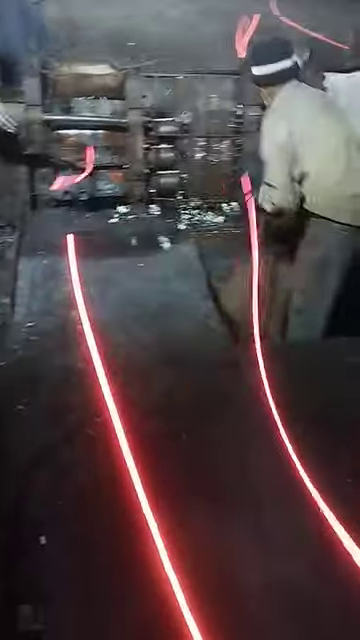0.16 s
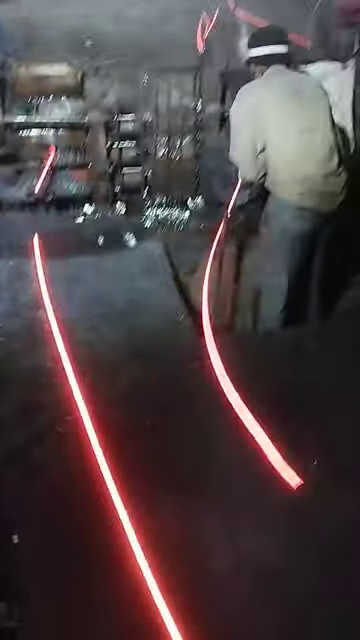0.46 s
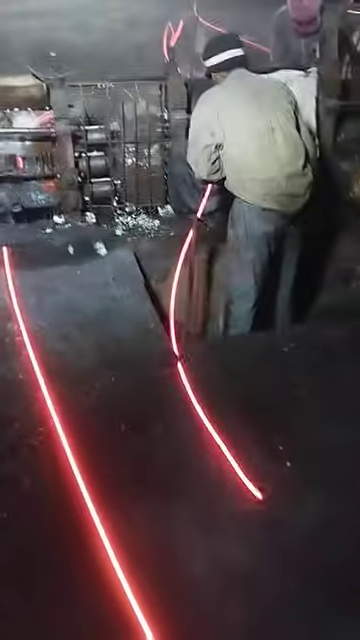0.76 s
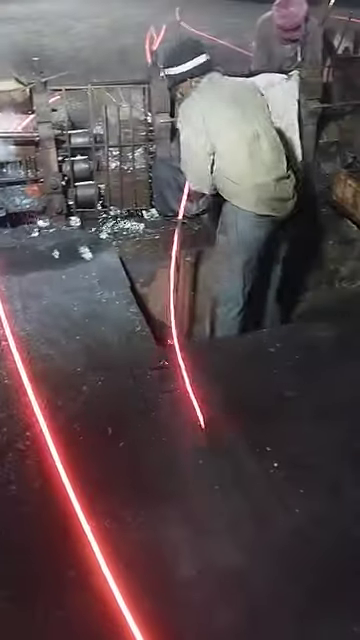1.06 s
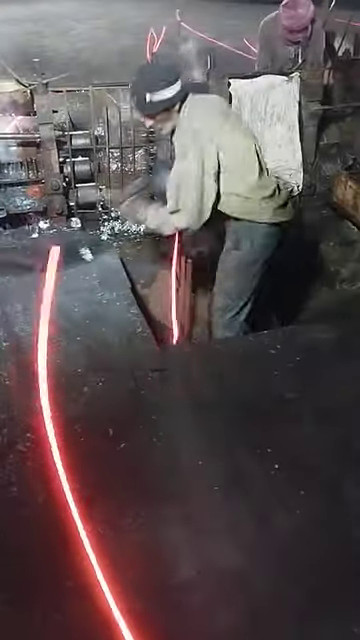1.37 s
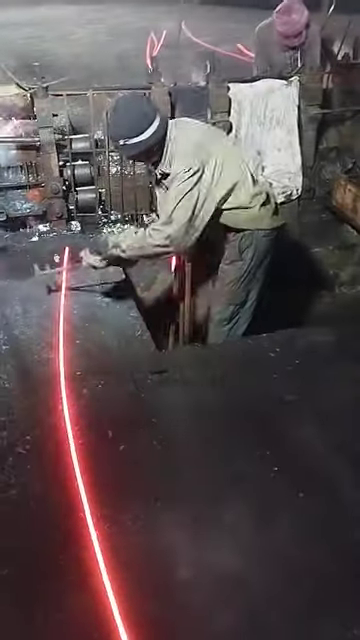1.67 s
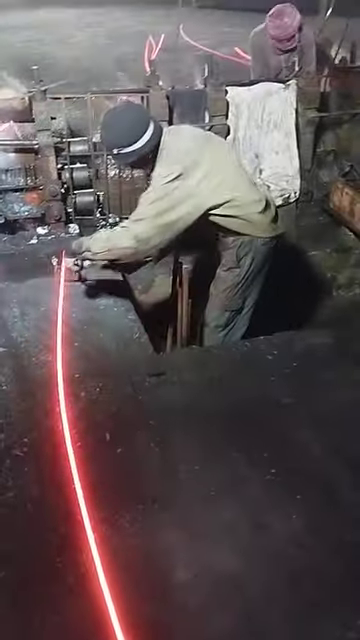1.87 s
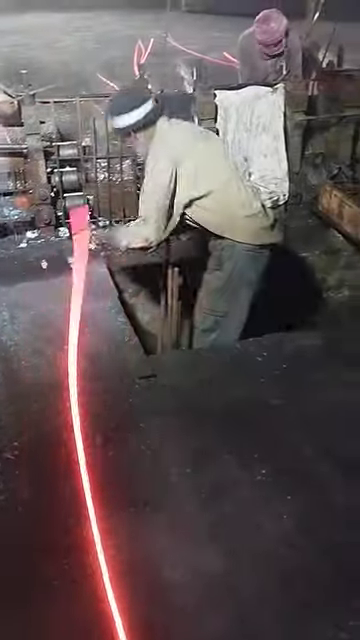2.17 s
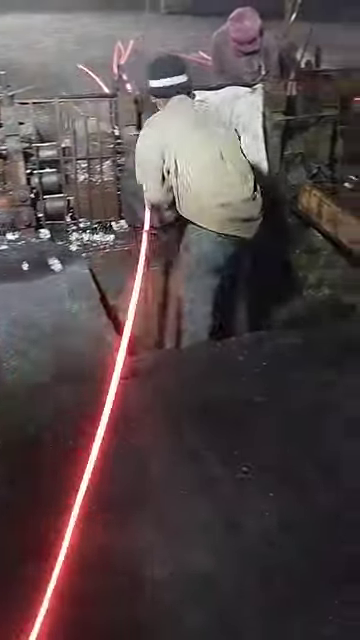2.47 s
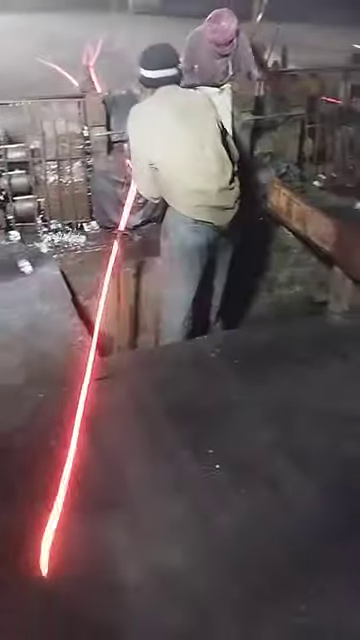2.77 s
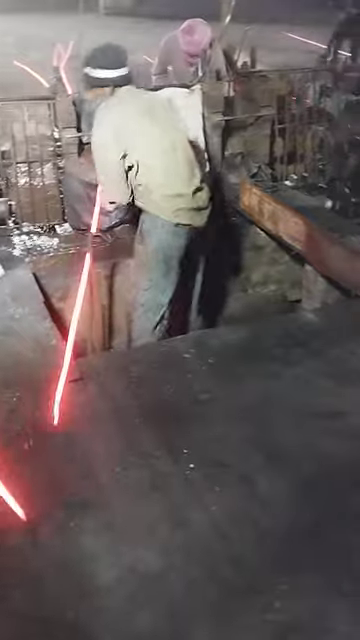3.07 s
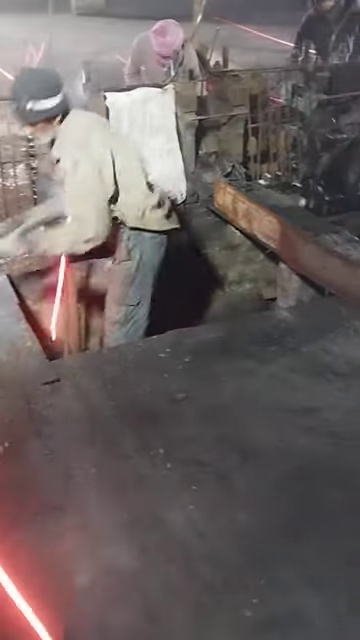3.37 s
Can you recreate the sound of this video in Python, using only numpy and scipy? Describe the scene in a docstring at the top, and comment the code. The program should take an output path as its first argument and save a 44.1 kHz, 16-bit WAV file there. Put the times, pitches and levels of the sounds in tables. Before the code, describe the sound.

A steel rolling mill drones on one low, unevenly throbbing tone over rumble and roar; rolls scrape several times a second, rods clatter in guides and couplings knock dully, in a large reverberant hall, in stereo.

```python
"""The stands of a steel rolling mill drone and rumble in a large hall: one low tone of uneven level over noise.
Shaft and gears hum as sines, slightly wavering. Couplings knock and steel parts rattle as noise and rings.
The rolls scrape and crackle about six times a second, and noise near one pitch makes brief squeals.
The rod slaps and clatters in the guides; tongs clank once, and faint thin high rings come mostly on the left."""
import sys
import numpy as np
from scipy import signal
from scipy.fft import rfft, irfft
from scipy.io import wavfile
from scipy.ndimage import uniform_filter1d, minimum_filter1d

SR = 44100
rng = np.random.default_rng(int(sys.argv[2]) if len(sys.argv) > 2 else 0)


def output_pcm(signal):
    """Save a mono or channel-first signal as 16-bit PCM at the path in sys.argv[1].

    Samples are clipped to [-1, 1] before scaling.
    """
    pcm = np.clip(np.atleast_2d(signal).T, -1, 1) * 32767
    wavfile.write(sys.argv[1], SR, np.round(pcm).astype(np.int16))


N = 155232

# spectrum of roar and rattle: (frequency [Hz], relative level [dB])
ROAR_SPECTRUM = [(100, -17.5), (350, -1), (480, 0.5), (570, -5.5), (820, -4.5), (1000, -10.5), (1300, -9),
                 (1700, -16), (2500, -19), (2900, -22.5), (5000, -23), (6800, -33), (8100, -47.5),
                 (9700, -43), (11200, -52), (13500, -38), (16000, -38.5)]
# spectrum of roll scrape and slap crack: (frequency [Hz], relative level [dB])
SCRAPE_SPECTRUM = [(300, -25), (1100, -15), (1800, 0), (2500, -3), (3100, -1.5), (4100, -1.5), (5200, -3),
                   (5800, -5), (6800, -5.5), (8100, -23.5), (9700, -21.5), (11200, -31.5), (13500, -17),
                   (16000, -24)]
# spectrum of guide clatter and slap body: (frequency [Hz], relative level [dB])
CLATTER_SPECTRUM = [(300, -27), (550, 4), (820, 6.5), (1000, -5), (1250, 1), (1700, -11.5), (2400, -6.5),
                    (3000, -23.5), (7000, -46.5)]
SURGE_FROM_HZ = 215  # rumble and hum tones above this follow the surge


def amp(db):
    """Decibels to gain."""
    return 10 ** (np.asarray(db) / 20)


def evened(x):
    """Scales to rms 1."""
    return x / np.sqrt(np.mean(x ** 2) + 1e-20)


def clock():
    """Time of each sample [s], and frequency of each bin [Hz]."""
    return np.arange(N) / SR, np.fft.rfftfreq(N, 1 / SR)


def read(points):
    """A table over frequency, read at each bin on a log axis."""
    f, value = np.transpose(points)
    return np.interp(np.log(clock()[1] + 1), np.log(f + 1), value)


def noise():
    """Unrelated white noise at each microphone."""
    return rng.standard_normal((2, N))


def coloured(x, gain):
    """Filters by a gain per bin; rms 1."""
    return evened(irfft(rfft(x) * gain, N))


def peak(hz, width_hz):
    """Response of one resonance, width at -3 dB; squaring it narrows the band."""
    return 1 / (1 + 2j * (clock()[1] - hz) / width_hz)


def drift(rate_hz):
    """Random drift of rms 1, mostly slower than rate_hz."""
    f = clock()[1]
    return coloured(rng.standard_normal(N), (f > 0) / (1 + (f / rate_hz) ** 4))


def dying(start_s, t60_s):
    """Sudden start, exponential decay by 60 dB in t60_s."""
    age = clock()[0] - start_s
    return (age >= 0) * np.exp(-np.log(1000) * np.maximum(age, 0) / t60_s)


def smeared(events, rise_s, t60_s):
    """Level of a series of (time, dB) blows drawn out by the hall; their powers add."""
    t = clock()[0]
    power = 0
    for start_s, db in events:
        rise = np.clip((t - start_s) / rise_s, 0, 1)
        power = power + (amp(db) * rise * dying(start_s, t60_s)) ** 2
    return np.sqrt(power)


def hall(x):
    """Diffuse tail of the hall: convolution with decaying noise."""
    tail = noise() * dying(0, t60_s=0.7)
    return signal.fftconvolve(x, tail / np.linalg.norm(tail[0]), axes=1)[:, :N]


def surge():
    """Common gain of the upper rumble and the gear tones."""
    # (time [s], level [dB])
    surge_points = [(0, -2), (.06, -1.5), (.2, -0.5), (.3, -8), (.39, 0), (.47, -4), (.6, 0.5), (.72, 1.5),
                    (.87, -0.5), (1, -4), (1.12, -4.5), (1.232, -8.5), (1.341, 0), (1.45, 0.5), (1.681, -3),
                    (1.85, 1.5), (1.94, -3.5), (2.02, -8.5), (2.1, -.5), (2.22, 0.5), (2.26, 1),
                    (2.32, -1.5), (2.5, -1.5), (2.73, 2.5), (2.76, -4.5), (2.8, 1), (3.1, -1), (3.31, -0.5),
                    (3.365, -4), (3.41, 1), (3.52, -4)]
    return amp(np.interp(clock()[0], *np.transpose(surge_points)))


def motor():
    """Shaft and gear tones that waver slightly at random in pitch and level; the upper ones also surge."""
    # continuous tones: (mean frequency [Hz], rms level [dB], left-right balance [dB])
    hums = [(64.6, -28, 0.4), (97.14, -33.5, 0), (306.5, -20.5, -1), (613, -40.5, 9)]
    top_wander_hz, waver_db = 0.47, 1.2  # wander of the last tone; lower tones wander less
    out = np.zeros((2, N))
    for hz, db, pan_db in hums:
        wander_hz = top_wander_hz * np.sqrt(hz / hums[3][0])
        turns = np.cumsum(hz + wander_hz * drift(3.04)) / SR + rng.random()
        tone = np.sin(2 * np.pi * turns) * amp(waver_db * drift(4.0))
        if hz > SURGE_FROM_HZ:
            tone = tone * surge()
        out += amp([[db + pan_db / 2], [db - pan_db / 2]]) * evened(tone)
    return out


def rumble():
    """Low noise of the machinery; its upper part surges."""
    # (frequency [Hz], relative level [dB])
    rumble_spectrum = [(15, -31.5), (38, -18.5), (55, -16.5), (90, -8.5), (115, -12), (140, -1), (168, 0),
                       (202, 2), (224, -8), (245, -1.5), (320, -6), (350, -9), (450, -15), (600, -34),
                       (1200, -69)]
    whole = amp(-12.5) * coloured(noise(), amp(read(rumble_spectrum)))
    low = irfft(rfft(whole) / (1 + (clock()[1] / SURGE_FROM_HZ) ** 12), N)
    return low + (whole - low) * surge()


def roar():
    """Broad noise with a slow swell and a fast flutter."""
    level_db, swell_db, flutter_db = -25.5, 0.5, 1
    level = amp(level_db + swell_db * drift(1.4) + flutter_db * drift(28))
    return level * coloured(noise(), amp(read(ROAR_SPECTRUM)))


def rattle():
    """Many small blows at random times, each a short decaying burst of noise."""
    blows_per_s, level_db, spread_db = 100, -34, 3
    strength = amp(spread_db * np.minimum(rng.exponential(1, N), 2))
    blows = (rng.random(N) < blows_per_s / SR) * strength
    envelope = signal.fftconvolve(blows, dying(0, t60_s=0.034))[:N]
    bursts = coloured(noise() * envelope, amp(read(ROAR_SPECTRUM)))
    return amp(level_db) * evened(bursts + 0.11 * hall(bursts))


def loose_parts(count=30):
    """Small steel parts, each ringing briefly at its own pitch when shaken."""
    lowest_hz, highest_hz, level_db, t60_s, blows_per_s = 594, 2822, -37, 0.14, 260
    t, out = clock()[0][:SR // 2], np.zeros((2, N))
    for hz in np.geomspace(lowest_hz, highest_hz, count) * rng.uniform(0.94, 1.04, count):
        tone = np.sin(2 * np.pi * (hz * t + rng.random((2, 1))))
        ring = tone * np.exp(-np.log(1000) * t / t60_s) / hz ** 0.64
        blows = (rng.random(N) < blows_per_s / count / SR) * rng.uniform(0.17, 1, N)
        out += signal.oaconvolve(blows[None], ring, axes=1)[:, :N]
    return amp(level_db) * evened(out + 0.5 * hall(out))


def clank_and_high_rings():
    """Tongs snap shut on the rod with one ringing clank; faint high rings are narrow decaying noise."""
    # clank: (frequency [Hz], relative level [dB])
    clank_spectrum = [(500, -16), (2000, -11), (2480, 3), (3000, 3.5), (5200, 1.5), (6800, -7), (8200, -22),
                      (10000, -23), (11500, -18.5), (14000, -16), (16000, -19.5)]
    # faint thin high rings: (time [s], level before panning [dB], frequency [Hz])
    high_rings = [(.209, -48, 13300), (.795, -51, 9780), (1.388, -55, 10800), (2.656, -44, 13300)]
    clank_s, hall_db = 2.03, -10
    clank = coloured(noise(), amp(read(clank_spectrum)))
    hits = amp(-29) * dying(clank_s, t60_s=0.16) * clank
    clank_ring = coloured(noise(), peak(2600, width_hz=300) ** 2)
    hits = hits + amp(-31) * dying(clank_s, t60_s=0.35) * clank_ring
    for start_s, db, hz in high_rings:
        high_ring = coloured(noise(), peak(hz, width_hz=250) ** 2)
        pan = amp([[-2], [-9]])  # louder on the left
        hits = hits + amp(db) * dying(start_s, t60_s=0.2) * high_ring * pan
    return hits + amp(hall_db) * hall(hits)


def guides():
    """Lumpy bursts of rod clatter: noise of quickly varying level under decaying envelopes."""
    # (time [s], level [dB])
    clatters = [(.19, -23.5), (.66, -26), (1.035, -24.5), (1.305, -22.5), (1.6, -25.5), (1.43, -27.5),
                (1.93, -23), (2.25, -24), (2.66, -25), (2.84, -25.5), (3.25, -22), (3.35, -25.5)]
    grain_db = 1
    clatter = coloured(noise() * amp(grain_db * drift(90)), amp(read(CLATTER_SPECTRUM)))
    return smeared(clatters, rise_s=0.016, t60_s=0.6) * clatter


def clacks():
    """The rod slaps the guides: a bright crack over the duller clatter of the guide, then the hall."""
    # (time [s], crack level [dB], body level [dB])
    slaps = [(0.337, -29, -38), (.385, -31.5, -28), (.544, -33.5, -32.5), (0.702, -34, -40.5),
             (.743, -32.5, -39), (1.035, -36.5, -23), (1.391, -39, -23), (1.871, -36, -30.5),
             (2.176, -40, -24.5), (2.272, -26, -32.5), (2.303, -31, -31), (3.149, -38, -18.5),
             (3.247, -33, -37), (3.442, -35, -46.5)]
    rise_s, t60_s, hall_db = 0.003, 0.11, -7
    crack_level = smeared([(s, db) for s, db, _ in slaps], rise_s, t60_s)
    body_level = smeared([(s, db) for s, _, db in slaps], rise_s, t60_s)
    crack = crack_level * coloured(noise(), amp(read(SCRAPE_SPECTRUM)))
    body = body_level * coloured(noise(), amp(read(CLATTER_SPECTRUM)))
    return crack + body + amp(hall_db) * hall(crack + body)


def couplings():
    """Dull knocks of the loose couplings: low noise with a soft start and a long decay."""
    # spectrum: (frequency [Hz], relative level [dB])
    knock_spectrum = [(100, -33), (210, -27), (260, 13.5), (330, -1), (420, -2), (600, -9), (850, -15.5),
                      (1400, -20.5), (2500, -32), (6000, -36.5), (9000, -55)]
    # (time [s], level [dB])
    knocks = [(.37, -10.5), (1.31, -14.5), (1.79, -14.5), (2.15, -13.5), (2.30, -17.5), (2.85, -18),
              (3.15, -13)]
    return smeared(knocks, rise_s=0.028, t60_s=0.87) * coloured(noise(), amp(read(knock_spectrum)))


def squeals():
    """The rod sticks and slips for a moment, giving a rough ring near one pitch."""
    # (peak time [s], level [dB], pitch [Hz], standard deviation of the Gaussian envelope [s])
    squeal_events = [(0.193, -39.5, 4200, 0.025), (0.743, -38.5, 4100, 0.03), (1.098, -30, 1160, 0.055),
                     (1.31, -37, 2670, 0.016), (2.354, -38, 2540, .04), (3.28, -36.5, 3970, 0.039),
                     (3.38, -34, 1760, 0.035)]
    width_share = 0.09  # of the pitch
    t, out = clock()[0], 0
    for peak_s, db, hz, length_s in squeal_events:
        envelope = np.exp(-0.5 * ((t - peak_s) / length_s) ** 2)
        out = out + amp(db) * envelope * coloured(noise(), peak(hz, width_share * hz) ** 2)
    return out


def crackle(count=22):
    """Scale cracks under the rolls: many tiny snaps, each ringing in its own band."""
    lowest_hz, highest_hz, width_share = 1500, 5500, 0.16
    snaps_per_s, t60_s, spread_db = 600, 0.04, 3
    decay = np.exp(-np.log(1000) / (t60_s * SR))  # per sample
    out = 0
    for hz in np.geomspace(lowest_hz, highest_hz, count):
        strength = amp(spread_db * np.minimum(rng.exponential(1, N), 2.5))
        snaps = (rng.random(N) < snaps_per_s / count / SR) * strength
        level = signal.lfilter([1], [1, -decay], snaps)
        out = out + rfft(noise() * level) * peak(hz, width_share * hz) ** 2
    return evened(irfft(out, N))


def rolls():
    """The rolls grind grit against the guides and set the steel ringing, now in one mode, now in another."""
    # scrapes of the turning rolls: (peak time [s], level [dB], fall to 1/e of the power [s])
    scrapes = [(0.123, -33, 0.027), (0.198, -37, 0.041), (0.344, -36, 0.04), (0.49, -33, 0.085),
               (0.708, -33, 0.053), (0.88, -35.5, 0.045), (1.08, -32, 0.054), (1.3, -33.5, 0.037),
               (1.45, -34.5, 0.05), (1.663, -37.5, 0.066), (1.874, -33.5, 0.052), (2.133, -40, 0.098),
               (2.286, -30.5, 0.068), (2.444, -34, 0.06), (2.667, -35, 0.11), (2.853, -32.5, 0.044),
               (3.046, -34.5, 0.048), (3.193, -34, 0.05), (3.26, -31, 0.055), (3.374, -37, 0.07),
               (3.468, -35, 0.05)]
    # modes of the rolls and guides: (frequency [Hz], gain at the peak [dB])
    steel_modes = [(791, 10.5), (845, 6), (920, 9), (1174, 6), (1227, 3), (1384, 5.5), (2371, -2),
                   (2482, -1.5), (2557, -2.5), (2660, -3), (2918, -3.5)]
    rise_share = 0.48  # rise time over fall time
    grit_db, crackle_db, flicker_db = 0.5, -4.5, 2.5
    idle_db, scrape_ring_db = -41.5, -1.5  # ring at all times; ring relative to the scrape
    width_at_1khz_hz = 10
    t = clock()[0]

    power = 0
    for peak_s, db, fall_s in scrapes:
        spread_s = fall_s * np.where(t < peak_s, rise_share, 1)
        power = power + amp(db) ** 2 * np.exp(-((t - peak_s) / spread_s) ** 2)
    rub = np.sqrt(power)

    grains = noise() * amp(grit_db * drift(120)) + amp(crackle_db) * crackle()
    grit = coloured(grains, amp(read(SCRAPE_SPECTRUM)))

    ring = 0
    for hz, db in steel_modes:
        response = amp(db) * peak(hz, width_at_1khz_hz * np.sqrt(hz / 1000)) ** 2
        flicker = amp(flicker_db * np.minimum(drift(12), 1))
        ring = ring + irfft(rfft(noise()) * response, N) * flicker
    return rub * grit + (amp(idle_db) + amp(scrape_ring_db) * rub) * evened(ring)


def drone():
    """The stands throb on one low tone whose pitch wavers a little."""
    # (time [s], rms level [dB])
    drone_level = [ (0, -9.5), (.09, -14), (.17, -11.5), (.23, -24), (.28, -7.5), (.31, -43), (.35, -32),
                   (.39, -17), (.5, -10.5), (.72, -15.5), (.79, -22), (.84, -11), (.935, -9), (.97, -40),
                   (1.04, -12.5), (1.2, -8.5), (1.245, -33), (1.29, -12), (1.38, -19.5), (1.495, -10),
                   (1.53, -30), (1.62, -9.5), (1.78, -18), (1.95, -15), (1.995, -6), (2.05, -28),
                   (2.12, -12.5), (2.24, -25), (2.32, -9.5), (2.36, -27), (2.45, -12.5), (2.58, -20.5),
                   (2.71, -14), (2.76, -37), (2.81, -13), (2.99, -12), (3.05, -8.5), (3.12, -39),
                   (3.18, -11), (3.33, -16.5), (3.38, -40.5), (3.44, -11.5), (3.52, -12.5)]
    # (time [s], mean pitch [Hz])
    drone_pitch = [(0, 170.9), (.55, 168), (.85, 174), (1.15, 168), (1.42, 164.7), (1.6, 170.8),
                   (3.52, 168.2)]
    wander_hz = 2.2
    t = clock()[0]
    pitch_hz = np.interp(t, *np.transpose(drone_pitch)) + wander_hz * drift(8.4)
    turns = np.cumsum(pitch_hz) / SR + rng.random()
    return evened(np.sin(2 * np.pi * turns)) * amp(np.interp(t, *np.transpose(drone_level)))


def scene():
    """The diffuse sound reaches both microphones alike in the bass, unrelated in the treble."""
    # correlation of the two microphones: (frequency [Hz], correlation [0-1])
    likeness = [(30, .95), (70, .975), (170, .96), (290, .99), (360, .97), (450, .8), (560, .5), (750, .22),
                (1200, .08), (2200, 0), (16000, 0)]
    # balance of the microphones: (frequency [Hz], left-right [dB])
    tilt = [(170, 0), (300, 0.5), (450, -3.5), (620, 2), (1000, 0.5), (2100, -3), (2800, 3), (3500, 0),
            (4200, -4), (5200, -3), (6500, 0.5), (7600, -3.5), (9500, 13), (11500, 12.5), (13500, 5.5),
            (16000, -8.5)]
    machinery = rumble() + roar() + rattle() + loose_parts()
    a, b = rfft(machinery + guides() + clacks() + couplings() + rolls())
    like = np.clip(read(likeness), -1, 1)
    mid = a * np.sqrt((1 + like) / 2)
    side = b * np.sqrt((1 - like) / 2)
    field = np.array([mid + side, mid - side]) + rfft(clank_and_high_rings() + squeals())
    half_tilt_db = read(tilt) / 2
    return irfft(field * amp([half_tilt_db, -half_tilt_db]), N) + motor() + drone()


def record(dry):
    """A limiter with smoothed gain holds the peaks; then a low-pass sets the band limit."""
    ceiling, edge_hz = 0.87, 15850
    gain = np.minimum(1, ceiling / (abs(dry).max(0) + 1e-9))
    gain = uniform_filter1d(minimum_filter1d(gain, size=601), size=601)
    lowpass = signal.firwin(511, edge_hz, window=("kaiser", 9), fs=SR)
    return signal.oaconvolve(dry * gain, lowpass[None], "same")


dry = scene()
out = record(dry)
output_pcm(out)
```